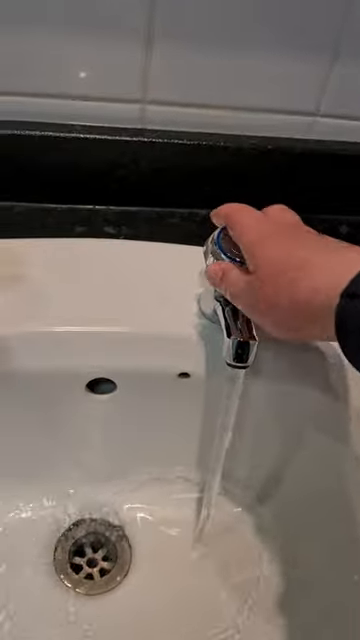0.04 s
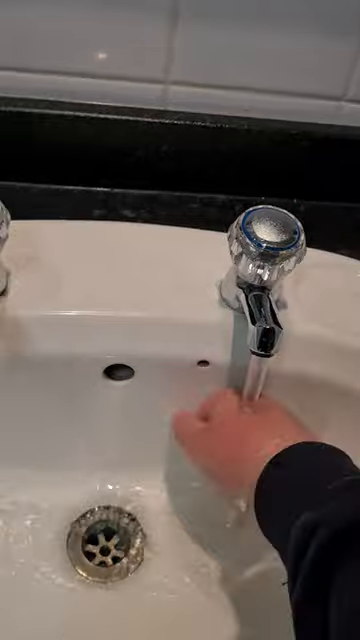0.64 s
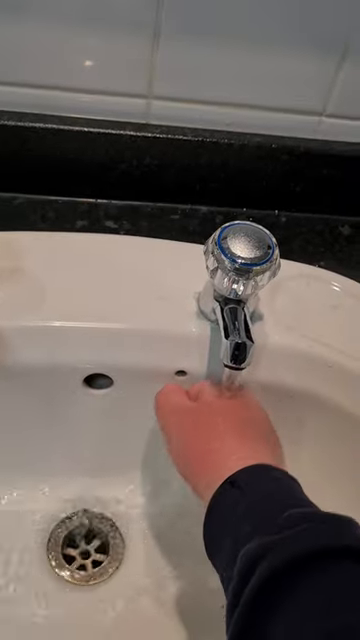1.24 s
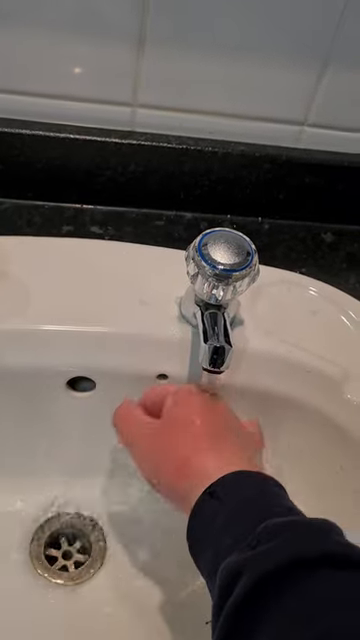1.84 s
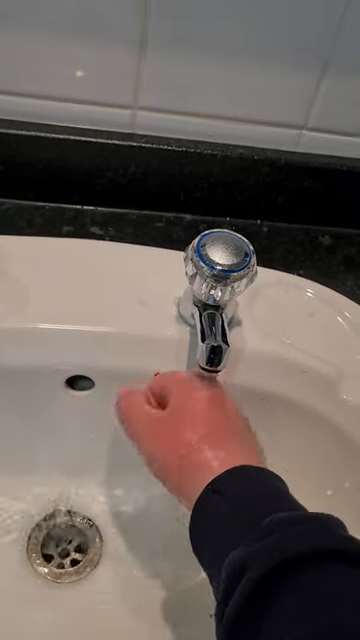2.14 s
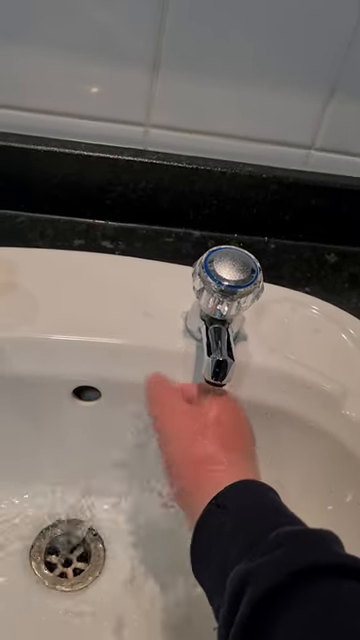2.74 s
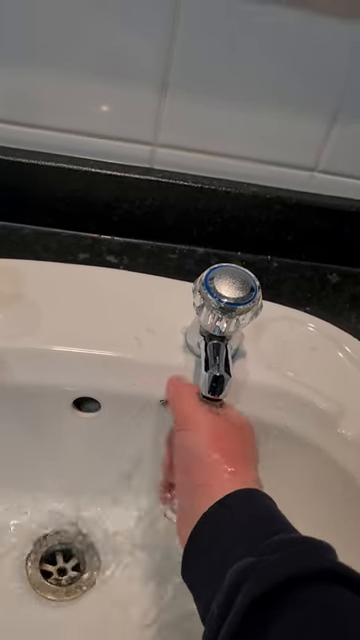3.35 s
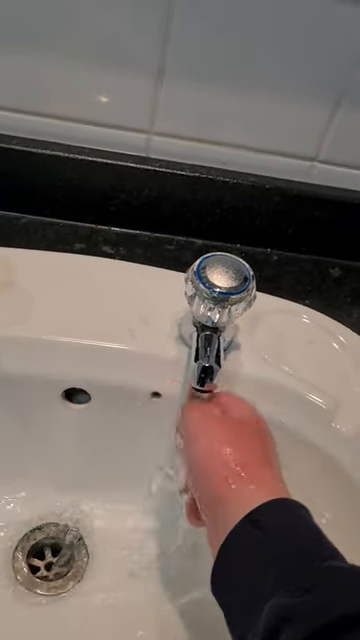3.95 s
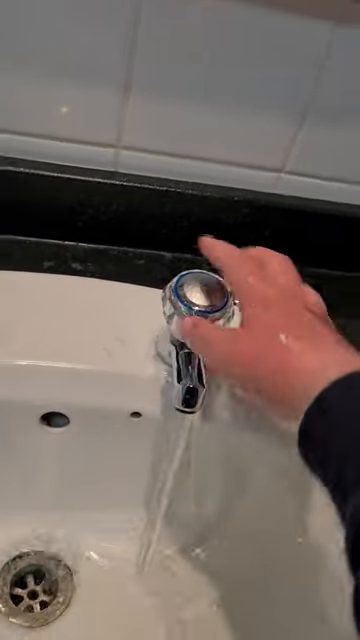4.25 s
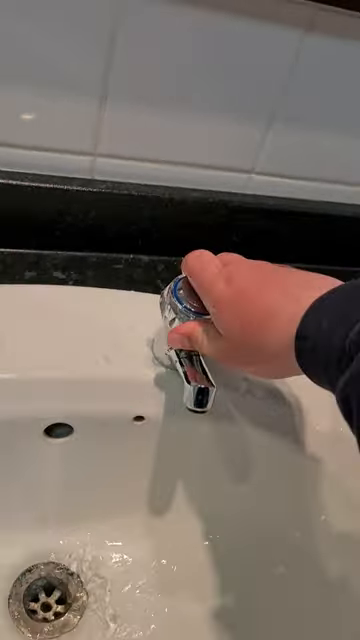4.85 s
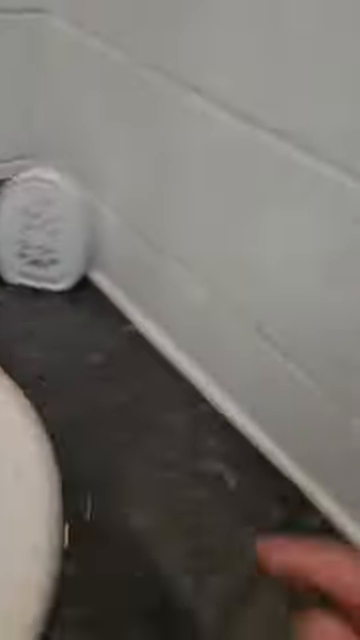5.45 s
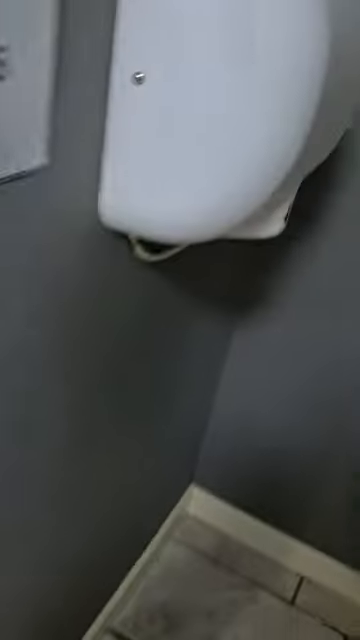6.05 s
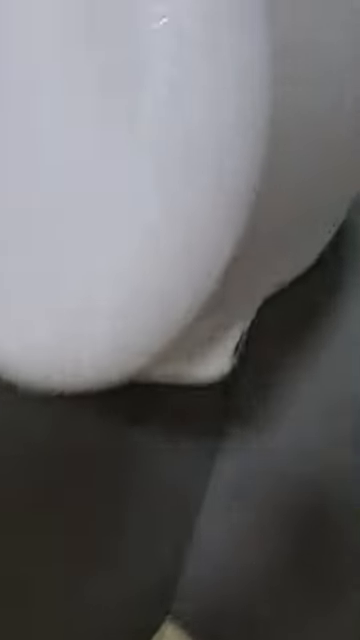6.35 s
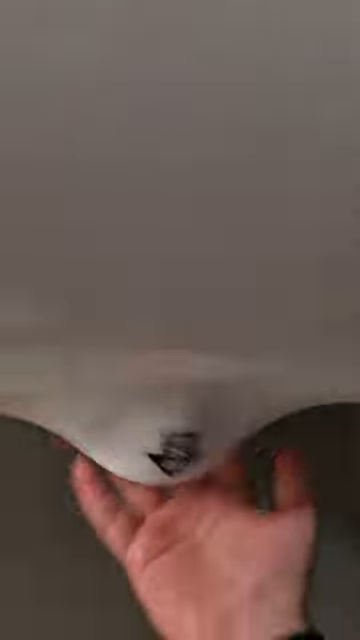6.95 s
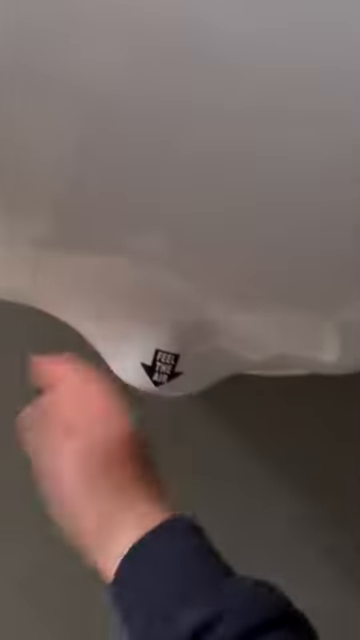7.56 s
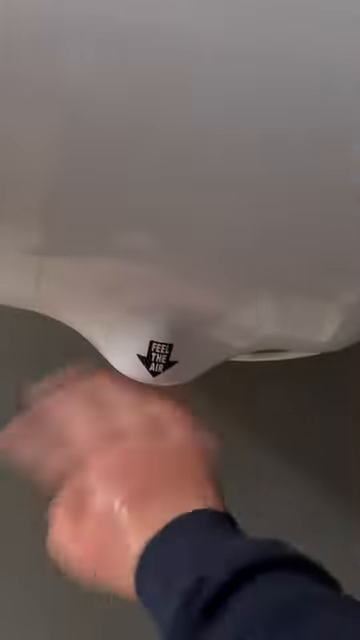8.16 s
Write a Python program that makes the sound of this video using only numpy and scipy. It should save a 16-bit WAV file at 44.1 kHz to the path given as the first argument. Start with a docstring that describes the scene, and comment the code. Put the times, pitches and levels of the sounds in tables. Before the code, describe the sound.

In a small tiled restroom, a tap runs over a hand close to the microphone, splashing unevenly into a ceramic basin while the drain gurgles. The water shuts off after about five seconds and the drain empties over a low ventilation hum. A sharp metallic snap and faint scuffs follow. Then an electric hand dryer clicks on and spins up to a loud roar, howling and hissing over the hand.

```python
"""A small tiled restroom, with the ventilation humming. A tap runs over a hand into a ceramic basin:
droplets tick on impact, lumps of water slap, and trapped bubbles ring as tiny air springs, while the
gulping drain excites the modes of its pipe. The tap is shut and the drain empties. After a sharp metallic
snap and a few scuffs, an electric hand dryer starts with a jolt and spins up; its turbulent jet roars
in the casing and howls and hisses over a turning hand."""
import sys
import numpy as np
from scipy import signal
from scipy.fft import rfft, irfft
from scipy.io import wavfile

SR = 44100
rng = np.random.default_rng(int(sys.argv[2]) if len(sys.argv) > 2 else 0)


def store_pcm(level_fs):
    """Save levels as 16-bit WAV."""
    pcm = np.round(np.clip(level_fs, -1, 1) * 32767).astype(np.int16)
    wavfile.write(sys.argv[1], SR, np.atleast_2d(pcm).T)


N = 362502
T = np.arange(N) / SR
HZ = np.fft.rfftfreq(N, 1 / SR)

# Lumps and spatters of water; the last row, at 5.1 s, is a slurp at the drain after the tap is shut. Each row:
# start in seconds, level in dB, pitch in Hz, level of the shower of droplets in dB.
WATER_LUMPS = [(.325, -24, 1930, -33), (0.6392, -18.5, 5200, -61), (1.039, -17.5, 2060, -53),
               (1.315, -21.5, 5980, -31.5), (1.418, -18.5, 2380, -57), (1.5474, -18.5, 3030, -35),
               (1.8693, -11, 5060, -34), (2.1015, -25, 13500, -36), (2.3132, -16, 6000, -30),
               (2.601, -16.5, 3840, -28), (2.85, -19, 13400, -34), (3.1403, -16, 13000, -33.5),
               (3.15, -14.5, 3150, -48), (3.4744, -19, 2610, -59), (3.711, -19, 2550, -34.5),
               (4.084, -26, 4730, -35), (4.133, -22, 3460, -39), (4.6285, -16.5, 6600, -60),
               (5.102, -26, 2400, -41)]
# Modes of the waste pipe. Each row: frequency in Hz, level in dB, time to decay by 60 dB in seconds.
PIPE_MODES = [(345.6, -10, 0.32), (433.7, -7.5, 0.47), (985, -8, 0.07), (1164, -10, 0.075),
              (1930, -13, 0.1), (2560, -21.5, 0.042), (2910, -0.5, 0.047)]
# Run-up of the dryer's motor. Each row: time in seconds, speed in turns a second.
SHAFT_SPEED = [(7.05, 92), (7.27, 246), (7.6, 330.6), (8.22, 352)]
BUBBLE_CYCLES, BUBBLE_RISE = 7.5, .015  # cycles per decay time, upward glide of pitch
SWITCH_ON_S = 7.047


def amp(db):
    """Converts decibels to an amplitude ratio."""
    return 10 ** (np.asarray(db) / 20)


def unit(x):
    """Scales a sound so that the mean of its channels has rms 1."""
    return x / np.sqrt(np.mean(np.atleast_2d(x).mean(0) ** 2) + 1e-20)


def read(points, hz):
    """Interpolates a spectrum on a logarithmic frequency axis."""
    f, value = np.transpose(points)
    return np.interp(np.log(hz + 1), np.log(f), value)


def follow(rows):
    """Interpolates each column of a time curve at every sample."""
    s, *columns = np.transpose(rows)
    return [np.interp(T, s, c) for c in columns]


def add(mix, s, sound):
    """Superposes a sound on the mix at s seconds."""
    part = mix[max(round(s * SR), 0):][:len(sound)]
    part += sound[:len(part)]


def colour(x, db):
    """Filters by a gain for each frequency."""
    return irfft(rfft(x) * amp(db), N)


def drift(rate):
    """Random fluctuation of rms 1: noise low-passed at rate Hz."""
    return unit(irfft(rfft(rng.standard_normal(N)) * np.exp(-(HZ / rate) ** 2), N))


def resonate(x, hz, width):
    """A damped resonator of gain 1 whose frequency can follow a curve."""
    turn = np.exp(2j * np.pi * np.cumsum(hz * np.ones(x.shape[-1])) / SR)
    pole = np.exp(-np.pi * width / SR)
    return 2 * (turn * signal.lfilter([1 - pole], [1, -pole], x / turn)).real


def band(x, hz, width):
    """Two resonators in cascade give a band with steep sides."""
    return resonate(resonate(x, hz, width), hz, width)


def bell(t, width):
    """A Gaussian hump of height 1 around zero."""
    return np.exp(-np.minimum(abs(t / width), 6) ** 2)


def swell(t, length):
    """A critically damped envelope that peaks at the given length."""
    return t / length * np.exp(1 - t / length)


def burst(s, length):
    """A sudden onset at s seconds, then exponential decay."""
    return (T >= s) * np.exp(-np.maximum(T - s, 0) / length)


def surges_db(steady_db, events, rise_s, fall_s, lead_s=0):
    """Incoherent sounds add in power: the level of a steady sound plus one surge for each event."""
    t = np.arange(SR) / SR
    surge = (1 - np.exp(-t / rise_s)) * np.exp(-t / fall_s)
    surge /= surge.max()
    power = amp(steady_db) ** 2
    for s, _, _, db in events:
        add(power, s - lead_s, (amp(db) * surge) ** 2)
    return 10 * np.log10(power)


def bubble(hz, cycles, rise):
    """Minnaert resonance: trapped air rings as a damped spring, rising in pitch near the surface."""
    age = np.arange(int(6 * cycles / hz * SR)) * hz / cycles / SR  # in decay times
    phase = 2 * np.pi * cycles * age * (1 + rise * age)
    return np.sin(phase) * np.exp(-age) * (1 - np.exp(-age * cycles))


def room(x, wet_db):
    """Reverberation: direct sound and diffuse reflections off the tiles reach two microphones."""
    # Each row: frequency in Hz, reverberation time in seconds.
    decay_times = [(250, 1), (1000, 0.41), (5000, 0.58), (14000, 0.47)]
    t = np.arange(SR // 2) / SR
    reflections = rng.standard_normal((2, len(t))) * (1 + 1.98 * np.exp(-t / 0.013))  # close walls first
    hz, s, spectra = signal.stft(reflections, SR)
    tail = signal.istft(spectra * np.exp(-np.log(1000) * s / read(decay_times, hz)[:, None]), SR)[1]
    response = amp(wet_db) * tail / np.linalg.norm(tail[0])
    response[[0, 1], [0, 3]] += 1  # the direct sound, 3 samples later on the right
    return signal.fftconvolve(x[None], response / np.linalg.norm(response[0]), axes=1)[:, :N]


def spray(level_db, per_s=6000, spread_db=5.5, flutter_db=4.0, octaves=0.4):
    """Impact noise: droplets tick on hand and basin in quick clumps, each in its own register."""
    # Each row: frequency in Hz, gain of the spray in dB.
    spectrum = [(700, -18), (1700, -17.5), (3500, 3), (7000, 2), (8600, -2.5), (10500, 0), (12300, 2.5),
                (16000, 1)]
    sizes = amp(spread_db * np.minimum(rng.exponential(1, N), 4.5))  # a few are large
    sizes *= np.sign(rng.standard_normal(N))
    ticks = sizes * (rng.random(N) < per_s / SR) * amp(flutter_db * (drift(126) + drift(25)))
    registers = np.geomspace(1000, 15000, 11)
    pitch = rng.choice(registers, N)
    bands = (rfft(ticks * (pitch == hz)) * bell(np.log2((HZ + 1) / hz), octaves) for hz in registers)
    patter = irfft(sum(bands), N)
    return room(unit(colour(patter, read(spectrum, HZ))) * amp(level_db), wet_db=4)


def trickle(level_db, per_s=200, low_hz=1550, high_hz=7500, spread_db=7.0, share_db=-5):
    """Air entrainment: small bubbles are beaten into the film of water, each ringing at its own pitch."""
    out = np.zeros(N)
    for when, pitch, size, ring in rng.random((int(per_s * N / SR), 4)):
        strength = amp(-spread_db * np.log(size + .04))
        hz = low_hz * (high_hz / low_hz) ** pitch
        add(out, when * N / SR, strength * bubble(hz, BUBBLE_CYCLES * (.5 + ring), BUBBLE_RISE / 2))
    return room(unit(out) * amp(level_db + share_db), wet_db=3)


def pipe(x, wander_share=0.024, wander_hz=4.9):
    """The waste pipe's air column rings in its normal modes, which wander with the water level."""
    stretch, out = 1 + wander_share * drift(wander_hz), np.zeros(N)
    for hz, db, t60 in PIPE_MODES:
        width = np.log(1000) / (np.pi * t60)
        out += amp(db) * resonate(x, hz * stretch, width) * SR / (2 * np.pi * width)
    return out


def drain(flow_db, pops_per_s=46, full_hz=960, detune=0.21, glug_hz=300):
    """Bubble resonance: large bubbles kick the pipe, middling ones glug, small ones pop."""
    # Large air bubbles. Each row: start in seconds, level in dB, pitch in Hz, level of the churn in dB.
    large_bubbles = [(0.202, -22.5, 973, -46), (0.27, -22.5, 910, -29.5), (0.414, -21.5, 414, -32),
                     (0.825, -27, 325.4, -32.5), (0.855, -14.5, 891, -53), (1.275, -30, 407, -33),
                     (1.353, -24.5, 374, -38.5), (2.28, -25, 950, -45), (2.338, -24.5, 417, -39),
                     (2.414, -26, 960, -34.5), (2.741, -21.5, 425, -34.5), (3.171, -24, 846, -61),
                     (3.42, -26, 985, -31), (3.712, -17, 441, -31.5), (4.204, -26.5, 412, -32.5),
                     (4.361, -26, 1490, -42), (4.496, -25.5, 1150, -34), (4.715, -16, 400, -44),
                     (4.981, -27, 870, -30.5), (5.003, -24.5, 830, -53), (5.119, -20, 894, -29.5),
                     (5.405, -30.5, 1020, -50), (5.623, -27, 980, -33)]
    # An air pocket under the plughole opens and refills, so the pitch of the pops dips.
    # Each row: centre in seconds, half length in seconds, lowest pitch in Hz.
    air_pockets = [(1.775, 0.125, 670), (2.596, 0.07, 703), (3.97, 0.115, 778), (5.08, 0.15, 792)]
    level_db = surges_db(flow_db - 5.5, large_bubbles, rise_s=0.0045, fall_s=0.073)
    pocket_hz, pocket_gain = full_hz, amp(level_db - 8.5)
    for s, length, hz in air_pockets:
        opening = bell(T - s, length)
        pocket_hz += (hz - full_hz) * opening
        pocket_gain += amp(-53) * opening
    gulps, kicks, pops, glugs, nudges = np.zeros((5, N))
    push, flick = np.hanning(SR // 900), np.hanning(SR // 2600)  # a soft and a quick shove of air
    for s, db, hz, _ in large_bubbles:
        add(gulps, s, amp(db) * bubble(hz, BUBBLE_CYCLES, BUBBLE_RISE * rng.random()))
        coupling = min(PIPE_MODES[1][0] / hz, 1) ** 2  # big bubbles kick hardest
        add(kicks, s, amp(db - 4) * coupling * push / push.sum())
    for k, (late, pitch, lag, size) in enumerate(rng.random((int(pops_per_s * N / SR), 4))):
        s = (k + late) / pops_per_s
        pop_hz = pocket_hz[int(s * SR)] * (1 + detune * (pitch - .5))
        add(pops, s, bubble(pop_hz, BUBBLE_CYCLES, BUBBLE_RISE))
        add(glugs, s, size ** 2 * bubble(glug_hz * 2 ** pitch, BUBBLE_CYCLES, 2 * BUBBLE_RISE))
        add(nudges, (k + lag) / pops_per_s, flick)
    clumps = amp(3 * drift(29))
    filled = amp(level_db + np.interp(T, [4.8, 5], [0, -7]))  # the emptying pipe rings less
    gurgle = (unit(pipe(nudges * clumps)) * amp(-3.5) + unit(glugs) * amp(-11)) * filled
    return room(gulps + pipe(kicks) + gurgle + unit(pops * clumps) * pocket_gain, wet_db=-2)


def ventilation(hum_hz=100, throb_hz=22):
    """Tones over broadband flow noise: a wavering mains hum, the throb of the fan and moving air."""
    # Each row: time in seconds, levels of the hum's first and second harmonics in dB.
    hum_levels = [(0, -38.5, -73), (5.2, -38, -66), (5.6, -39.5, -46), (6.2, -43.5, -42.5), (6.5, -44, -52)]
    # Each row: frequency in Hz, gain of the moving air in dB.
    air_spectrum = [(30, -4), (200, -14), (400, -15), (1500, -34), (3200, -29), (8500, -57), (12000, -53)]
    first_db, second_db = follow(hum_levels)
    phase = 2 * np.pi * hum_hz * T
    hum = amp(first_db + 1) * np.sin(phase + 0.67 * drift(4.6)) * (1 + 0.37 * drift(7.7))
    hum += amp(second_db) * np.sin(2 * phase)
    throb = amp(-42) * np.sin(2 * np.pi * throb_hz * T)
    rumble = unit(band(rng.standard_normal(N), hz=117, width=103)) * amp(first_db - 13)
    air = amp(-46.5) * unit(colour(rng.standard_normal((2, N)), read(air_spectrum, HZ)))
    return hum + throb + rumble + air


def drips(cycles=11):
    """A drop striking standing water traps one bubble, whose free oscillation is the plink."""
    # Each row: start in seconds, level in dB, pitch in Hz.
    drops = [(.143, -27.5, 1880), (.554, -18.5, 2550), (1.06, -19.5, 2540), (2.6268, -12.5, 4700),
             (5.301, -27, 3160)]
    out = np.zeros(N)
    for s, db, hz in drops:
        add(out, s, amp(db) * bubble(hz, cycles, BUBBLE_RISE / 2))
    return room(out, wet_db=-2)


def slaps(crack_s=0.00039, scatter_s=0.0055, drop_share=0.081, hard_hz=5500, cluster_s=0.02):
    """On impact a lump of water scatters droplets and traps bubbles; small fast lumps also crack."""
    out, t = np.zeros(N), np.arange(SR // 6) / SR
    for s, db, hz, _ in WATER_LUMPS:
        droplets = (rng.random(len(t)) < drop_share) * amp(-8) * swell(t, scatter_s)
        hardness = min(hz / hard_hz, 1)
        impact = rng.standard_normal(len(t)) * (hardness * swell(t, crack_s) + droplets)
        crack = band(impact, hz, hard_hz / 3)
        add(out, s, amp(db + 6) * hardness * crack / abs(crack).max())
        for k, (late, pitch) in enumerate(rng.random((8, 2))):
            age = k * (k + late) / 64  # the bubbles thin out
            ring = bubble(hz * 2 ** ((pitch - .5) * min(k / 2, 1)), BUBBLE_CYCLES, BUBBLE_RISE)
            add(out, s + cluster_s * age, amp(db - 7) * (1 - hardness / 2) * np.exp(-age) * ring)
    return room(out, wet_db=-1)


def snap_and_scuffs(tick_s=6.199, snap_s=6.222):
    """Two impulses excite the modes of a metal part; a soft step and scuffs follow as bands of noise."""
    # Each row: frequency in Hz, gain of the snap in dB.
    snap_spectrum = [(300, -27), (2400, -6.5), (3000, -0.5), (6300, 5), (8500, -11), (12000, -5.5)]
    # Each row: frequency of a mode in Hz, boost in dB.
    metal_modes = [(3080, 2), (4893, 10), (6150, 10), (10500, 16)]
    # Each row: time in seconds, level in dB, band centre in Hz, rise time in seconds.
    scuffs = [(6.282, -45, 191, 0.024), (6.765, -51, 4800, 0.03), (6.932, -54, 4600, 0.036)]
    out, clicks, noise = np.zeros(N), np.zeros(N), rng.standard_normal(N)
    for s, db, hz, length in scuffs:
        add(out, s, amp(db + 7) * unit(band(noise, hz, 1.8 * hz)) * swell(T, length))
    add(clicks, tick_s, [amp(-8)])
    add(clicks, snap_s, [amp(12)])
    snap = colour(clicks, read(snap_spectrum, HZ))
    ring = sum((amp(db) - 1) * resonate(snap, hz, width=70) for hz, db in metal_modes)
    return room(out + snap + ring, wet_db=12)


def motor(buzz_hz=100, inrush_s=0.21):
    """Starting transient: a relay click, a jolt and a fading mains buzz, as the fan's tone climbs."""
    speed, = follow(SHAFT_SPEED)
    noise = rng.standard_normal(N)
    whine = amp(-29) * unit(band(noise, speed, width=18))  # the fan's tone, made fuzzy by the air
    phase = 2 * np.pi * buzz_hz * (T - SWITCH_ON_S)
    buzz = sum(amp(db) * np.sin((k + 1) * phase) for k, db in enumerate([-19, -21, -29]))
    jolt = amp(-25) * unit(band(noise, hz=200, width=220)) * burst(SWITCH_ON_S, 0.1)
    relay = amp(-16) * unit(resonate(noise, hz=1460, width=2550)) * burst(SWITCH_ON_S, 0.0037)
    running = whine * (T > SWITCH_ON_S) * speed / speed.max() + buzz * burst(SWITCH_ON_S, inrush_s)
    return running + jolt + room(relay, wet_db=23)


def jet(casing_width_hz=18, knee_turns_per_s=200, hiss_db_per_decade=45, wall_gap_hz=149.8):
    """Turbulence noise grows with fan speed: it roars in the casing and hisses at nozzle and fingers."""
    # Each row of both spectra: frequency in Hz, gain in dB.
    roar_spectrum = [(40, -8), (110, -3), (200, -2.5), (340, 0), (1200, -0.5), (2500, -5.5), (4000, -38.5)]
    hiss_spectrum = [(1500, -4), (2800, 5.5), (4700, -1), (6200, 1), (7400, -1.5), (9000, -11),
                     (12000, -2.5), (16000, -8)]
    # Resonances of the casing and its corner. Each row: frequency in Hz, boost in dB.
    casing_modes = [(438, 6), (622, 3.5), (1080, 7), (1230, 8)]
    # The hand slips out of the jet. Each row: centre in seconds, half length in seconds, gain in dB.
    lulls = [(7.428, 0.047, -6.5), (7.638, 0.03, -2.5)]
    speed, = follow(SHAFT_SPEED)
    howl, finger_gain = hand()
    roar_noise, hiss_noise = rng.standard_normal((2, 2, N))
    casing_db = sum(db / (1 + ((HZ - hz) / casing_width_hz) ** 2) for hz, db in casing_modes)
    roar_gain = amp(-17.5) * np.tanh((speed / knee_turns_per_s) ** 4.5)  # levels off above the knee
    roar = unit(colour(roar_noise, read(roar_spectrum, HZ) + casing_db)) * roar_gain
    nozzle_gain = amp(-22.5 + hiss_db_per_decade * np.log10(speed / speed.max()))
    hiss = unit(colour(hiss_noise, read(hiss_spectrum, HZ))) * (nozzle_gain + finger_gain)
    # Repeated reflection between casing and wall makes a comb filter.
    round_trip = 0.17 * bell(HZ, 3800) * np.exp(2j * np.pi * HZ / wall_gap_hz)
    wall_db = -20 * np.log10(abs(1 - round_trip))
    lull_db = sum(db * bell(T - s, length) for s, length, db in lulls)
    gust_db = 0.9 * drift(33)
    return colour(roar + howl + hiss, wall_db) * amp(lull_db + gust_db) * (T > SWITCH_ON_S)


def hand(width_share=0.38, crossfeed=0.5, finger_db=-12):
    """Cavity resonance: the palm howls in the jet. Returns the howl and the gain of the finger hiss."""
    # Each row: centre of a pass in seconds, half length in seconds, level in dB, palm's pitch in Hz.
    passes = [(7.229, 0.077, -21.5, 457.7), (7.314, 0.051, -16.5, 618), (7.349, 0.026, -20, 1270),
              (7.381, 0.029, -12.5, 1930), (7.467, 0.021, -18, 2000), (7.528, 0.059, -24.5, 1090),
              (7.719, 0.042, -19, 2540), (7.794, 0.045, -19, 2020), (7.889, 0.059, -19.5, 1940),
              (8.022, 0.034, -15.5, 1930), (8.192, 0.015, -14.5, 1920)]
    howl, finger_gain = np.zeros((2, N)), np.zeros(N)
    t = np.arange(-SR // 8, SR // 8) / SR
    flat_hz = max(row[-1] for row in passes)  # a flat hand hisses more than a cupped one
    for s, length, db, hz in passes:
        air = rng.standard_normal((2, len(t)))
        strength = amp(db) * bell(t, length)
        hollow = unit(band(air + crossfeed * air[::-1], hz, width_share * hz))
        for channel, sound in zip(howl, hollow):
            add(channel, s + t[0], sound * strength)
        add(finger_gain, s + t[0], amp(finger_db) * strength * hz / flat_hz)
    return howl, finger_gain


def scene():
    """Superposition of water, ventilation and dryer; the tap's flow drives splashing and gurgling."""
    # The tap runs, is shut and drips dry. Each row: time in seconds, level of the splashing in dB.
    tap_flow = [(0, -48), (.08, -40), (2.7, -37), (4.25, -39.5), (4.68, -45.5), (4.87, -55), (5.65, -59),
                (6.1, -64)]
    # Each entry: a moment in seconds when the splashing lets up.
    letups = [.2, .98, 1.789, 2.5, 3.0]
    flow_db, = follow(tap_flow)
    letup_db = -6 * sum(bell(T - s, 0.06) for s in letups)
    # A shower surrounds each lump; its first droplets land ahead of it.
    splash_db = surges_db(flow_db + letup_db, WATER_LUMPS, rise_s=0.023, fall_s=0.04, lead_s=0.018)
    water = spray(splash_db) + trickle(splash_db) + drain(flow_db) + slaps() + drips()
    water *= np.interp(T, [6, 6.6], [1, .3])  # the basin is left behind
    return water + ventilation() + snap_and_scuffs() + motor() + jet()


def record(dry):
    """Two close microphones share the long waves and lean right in the treble; clipping, then low-pass."""
    # Each row: frequency in Hz, gain of the side signal in dB.
    stereo_width = [(110, -11.5), (380, -7.5), (700, -2), (1400, 0)]
    # Each row: frequency in Hz, left against right in dB.
    balance = [(150, -0.5), (600, -3.5), (1250, 2.5), (2400, -4), (15000, -6)]
    mid = dry.mean(0)
    side = colour((dry[0] - dry[1]) / 2, read(stereo_width, HZ))
    pair = colour(np.array([mid + side, mid - side]), np.outer([.5, -.5], read(balance, HZ)))
    low_pass = signal.firwin(511, cutoff=15900, window=("kaiser", 9), fs=SR)
    return signal.oaconvolve(np.clip(pair, -1, 1), low_pass[None], "same", axes=1)


dry = scene()
out = record(dry)
store_pcm(out)
```